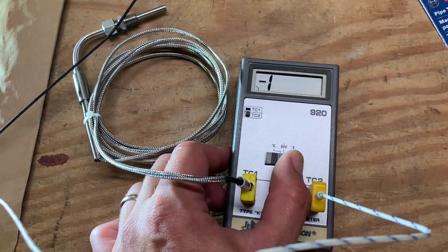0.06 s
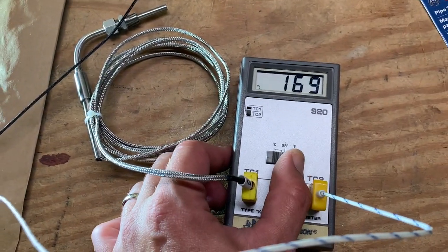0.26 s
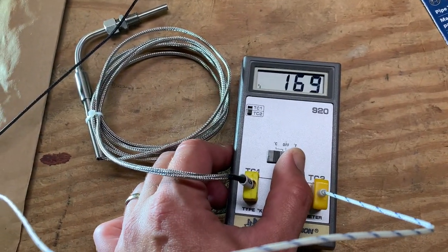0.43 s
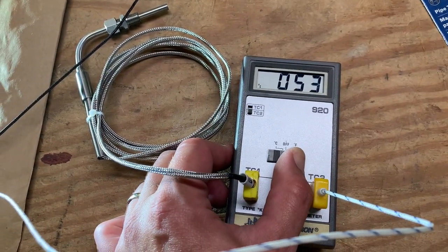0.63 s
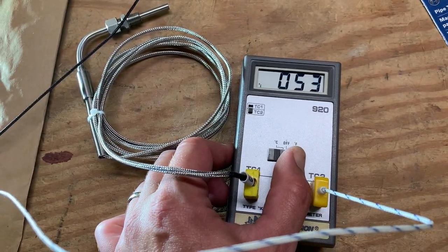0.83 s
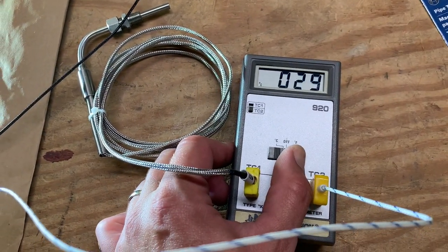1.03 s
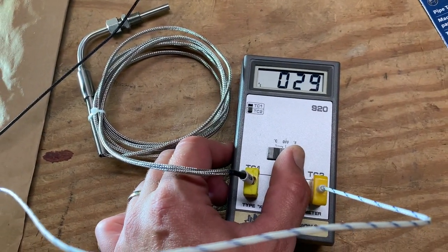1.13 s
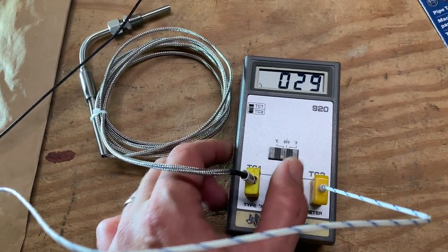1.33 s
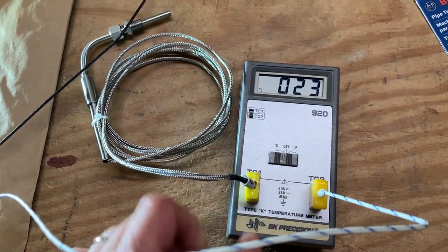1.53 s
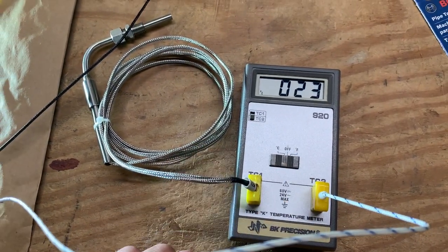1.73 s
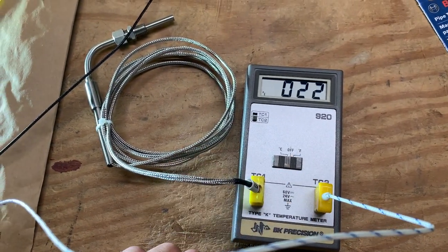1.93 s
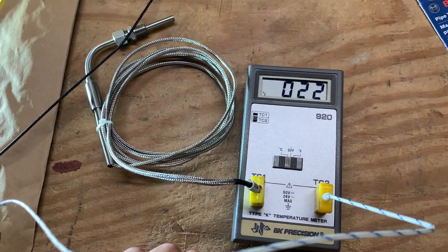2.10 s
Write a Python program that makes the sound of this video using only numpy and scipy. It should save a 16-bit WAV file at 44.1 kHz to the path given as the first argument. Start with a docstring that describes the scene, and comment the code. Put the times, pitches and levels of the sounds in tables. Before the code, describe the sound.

A plastic slide switch snaps sharply, then low buffeting thumps and quiet workshop room tone

```python
"""Slide switch on a workshop bench

A thumb snaps the slide switch of a plastic meter on a wooden bench, close to a handheld camera.
Struck modes and noise cracks make the snap, the boom of the board and a few soft ticks.
Pulses through a resonance make a run of low buffets, then fainter ones; patchy filtered noise
makes the hand's rustle, the swelling workshop tone and the hiss. Decaying noise is the room."""
import sys
import numpy as np
from scipy import signal
from scipy.fft import rfft, irfft, next_fast_len
from scipy.io import wavfile
from scipy.ndimage import uniform_filter1d

SR = 44100
rng = np.random.default_rng(int(sys.argv[2]) if len(sys.argv) > 2 else 0)


def wav_out(sig):
    """Save sig, one row per channel (or a flat mono array), as 16-bit PCM at SR to the path in sys.argv[1]."""
    wavfile.write(sys.argv[1], SR, np.round(np.clip(np.atleast_2d(sig).T, -1, 1) * 32767).astype(np.int16))


def volts(x):
    """Linear amplitude factor 10**(x/20) for a level x in dB, scalar or array-like."""
    e = np.asarray(x, float) / 20
    return 10 ** e


N = 95344  # length in samples

# Workshop tone. Each row: frequency in Hz, relative density in dB per Hz.
ROOM_TONE_SPECTRUM = [(20, -32), (35, 2), (113, -5), (161, -8.5), (227, -3), (328, -12.5), (377, -20),
                      (447, -12), (546, -19.5), (952, -31), (1500, -30.5), (2400, -73)]
# Slow swell of the workshop tone. Each row: time in seconds, added gain in dB.
ROOM_TONE_SWELL = [(0, 16), (.62, -0.5), (.9, 6.5), (1.45, 3.5), (1.7, 9), (1.86, 1.5)]
# Steady hiss. Each row: frequency in Hz, relative density in dB per Hz.
HISS_SPECTRUM = [(760, -29), (1300, -11.5), (1710, -12.5), (2150, 1.5), (2610, -10.5), (4930, -14),
                 (7450, -19), (8840, -9.5), (10600, -16), (11600, -22.5), (13100, -13), (14300, -28.5)]
# Stereo likeness of all the noises. Each row: frequency in Hz, left-right correlation.
NOISE_LIKENESS = [(60, 0.47), (290, 0.27), (640, 0.29), (1400, 0.18)]
ROOM_TONE_BASE_DB, HISS_DB = -59.5, -79  # rms; the swell adds to the first

# Decay of the room. Each row: frequency in Hz, time to fall 60 dB in seconds.
ROOM_DECAY = [(150, .25), (500, 0.58), (1500, .9), (4300, .62), (5600, 0.3), (14000, 0.37)]
WALLS_DB, CLUTTER_DB, CLUTTER_T60_S = -18, -10, 0.11
TICK_SEND_DB, BENCH_SEND_DB = 3.5, -16  # gain into the room

# Bouts of buffets. Each row: start in seconds, length in seconds, level in dB, typical pulse width in ms.
BUFFET_BOUTS = [(0.153, 0.042, -30.5, 2.64), (0.197, 0.04, -31, 0.99), (0.227, 0.028, -33.5, 3.1),
                (0.254, 0.03, -38.5, 1.56), (0.275, 0.035, -34, 2.46), (0.311, 0.011, -32.5, 1.65),
                (0.323, 0.029, -33, 3.6), (1.385, 0.064, -54.5, 2.9), (1.619, 0.073, -49.5, 2.7),
                (1.884, 0.027, -49, 2.2), (1.897, 0.033, -42.5, 2.9), (1.962, 0.062, -49, 3.5)]
BUFFETS_PER_S, BOUT_EDGE_S = 120, 0.0061
BUFFET_WIDTH_SPREAD, BUFFET_SCATTER_DB = 0.18, 1  # the spread is in natural log of the width
BUFFET_LIKENESS = 0.82  # sets how alike left and right are
LOW_RESONANCE_HZ, LOW_RESONANCE_WIDTH_HZ = 66.7, 63.5

# Hand strokes. Each row: start in seconds, length in seconds, drag level in dB, fizz level in dB.
HAND_RUBS = [(1.235, 0.061, -68, -84.5), (1.285, 0.061, -74.5, -87), (1.35, 0.1, -78, -83.5),
             (1.605, 0.077, -81, -85.5)]
# Dull drag of skin. Each row: frequency in Hz, relative density in dB per Hz.
DRAG_SPECTRUM = [(800, -16), (1500, 0), (2500, -2), (3300, -13), (5200, -16), (6500, -40)]
# Fine fizz of skin. Each row: frequency in Hz, relative density in dB per Hz.
FIZZ_SPECTRUM = [(7000, -27), (8500, 2), (10500, -2), (13000, -28), (14000, -58)]
RUB_EDGE_S = 0.012

# Dull ticks on the case. Each row: time in seconds, blow level in dB.
CASE_TICKS = [(1.245, -45), (1.7045, -38), (1.708, -39), (1.712, -42)]
TICK_HZ, TICK_WIDTH_HZ = 1850, 1500

# Soft knocks on the bench. Each row: time in seconds, blow level in dB.
BENCH_KNOCKS = [(1.244, -44), (1.609, -37), (1.6165, -38.5), (1.706, -44)]
# Modes of the board. Each row: frequency in Hz, relative level in dB, time to fall 60 dB in seconds.
BENCH_MODES = [(170, -2.5, 0.049), (215, 3.5, 0.07), (290, -6, 0.049), (447, -9, .04)]
BENCH_DB, BENCH_DELAY_S = -12.5, 0.0038  # against the switch contacts
BENCH_RISE_S, KNOCK_RISE_S = 0.0069, 0.0024

# Switch contacts: release, stop and rebounds. Each row: time in seconds, blow level in dB.
SWITCH_CONTACTS = [(0.0202, -26.5), (.0247, -13), (.0255, -11.5), (0.027, -14.5), (0.0293, -17),
                   (0.0319, -27)]
# Modes of the case. Each row: frequency in Hz, relative level in dB, time to fall 60 dB in seconds.
CASE_MODES = [(995, -4.5, 0.015), (1177, -5, 0.014), (1420, -8.5, 0.013), (1670, -4.5, .013),
              (2136, -5, .011), (2500, -7.5, .009), (3015, -10, .008), (3720, -8, 0.0064), (4370, -3, .008),
              (5900, -13.5, .007), (7970, 2.5, .013), (9450, -13, .007), (14500, -7.5, .005)]
CRACK_DB, CRACK_T60_S, MODE_SCATTER_DB = -0.5, 0.0046, 0.5

# Phase of the direct switch. Each row: frequency in Hz, lead of left over right in radians.
SWITCH_PHASE = [(0, 0.1), (1200, 1.6), (4700, 2.2), (5500, 4.7), (10400, 4.9)]
# Balance of the direct switch. Each row: frequency in Hz, left minus right in dB.
SWITCH_BALANCE = [(60, -2), (180, -3), (550, 4.5), (1650, 4.5), (4970, 3), (15000, 1.5)]
# How the microphone ports hear case, board and ticks. Each row: frequency in Hz, gain in dB.
PORT_RESPONSE = [(4600, 1.5), (6000, -7), (9000, -2.5), (11500, -8.5), (14600, -9.5), (15600, -4.5),
                 (17200, -37)]


def unit(x):
    """Scales a sound to rms 1."""
    return x / np.sqrt(np.mean(x ** 2) + 1e-20)


def along(points, hz):
    """Interpolates (Hz, value) points on a log frequency axis."""
    point_hz, value = np.transpose(points)
    return np.interp(np.log(hz + 1), np.log(point_hz + 1), value)


def curve(rows):
    """Draws one value per sample from (seconds, value) rows."""
    return np.interp(np.arange(N) / SR, *np.transpose(rows))


def filtered(x, response):
    """Multiplies the spectrum of x by a complex response of frequency."""
    size = next_fast_len(N + SR // 2)
    return irfft(rfft(x, size) * response(np.fft.rfftfreq(size, 1 / SR)), size)[..., :N]


def rush(spectrum, patchy_db):
    """Stereo noise of rms 1 whose gain wanders in patches of time and frequency."""
    noise = signal.stft(rng.standard_normal((2, N)), nperseg=512)[2]
    patches = uniform_filter1d(rng.standard_normal(noise.shape[1:]), size=5, axis=0)
    patches = uniform_filter1d(patches, size=8, axis=1)
    pair = signal.istft(noise * volts(patchy_db * unit(patches)), nperseg=512)[1][:, :N]

    def mid_side(hz):
        # this angle between mid and side sets the left-right correlation
        angle = np.arccos(np.clip(along(NOISE_LIKENESS, hz), -1, 1)) / 2
        return volts(along(spectrum, hz)) * [np.cos(angle), np.sin(angle)]

    mid, side = filtered(pair, mid_side)
    return unit(np.array([mid + side, mid - side]))


def struck(hits, modes, rise_s, crack_db):
    """Every blow rings decaying sine modes anew and adds a short noise crack."""
    out, t = np.zeros(N + SR), np.arange(SR // 4) / SR
    hz, level_db, t60 = np.transpose(modes)[:, :, None]
    for start, db in hits:
        mode_db = level_db + MODE_SCATTER_DB * rng.standard_normal(hz.shape)
        ring = (volts(mode_db - 60 * t / t60) * np.sin(2 * np.pi * hz * t)).sum(axis=0)
        ring *= 1 - np.exp(-t / rise_s)
        crack = volts(crack_db - 60 * t / CRACK_T60_S) * rng.standard_normal(len(t))
        out[round(start * SR):][:len(t)] += volts(db) * (0.5 * ring + crack)
    return out[:N]


def room_tone():
    """The workshop's low tone: shaped noise that swells and sinks."""
    return volts(ROOM_TONE_BASE_DB + curve(ROOM_TONE_SWELL)) * rush(ROOM_TONE_SPECTRUM, patchy_db=1.5)


def hiss():
    """A faint bed of higher shaped noise at a constant overall level."""
    return volts(HISS_DB) * rush(HISS_SPECTRUM, patchy_db=2.77)


def room(x):
    """A quick answer from the bench's clutter, and the walls, each frequency dying at its own speed."""
    hz, t, noise = signal.stft(rng.standard_normal((2, SR)), SR, nperseg=256)
    decay = volts(-60 * t / along(ROOM_DECAY, hz)[:, None])
    walls = signal.istft(noise * decay, SR, nperseg=256)[1][:, :SR]
    clutter = rng.standard_normal((2, SR)) * volts(-60 * np.arange(SR) / SR / CLUTTER_T60_S)
    echo = volts(WALLS_DB) * walls / np.linalg.norm(walls[0])
    echo += volts(CLUTTER_DB) * clutter / np.linalg.norm(clutter[0])
    delayed = np.pad(x, (120, 0))  # samples before the first echo
    return signal.fftconvolve(delayed[None], echo, axes=1)[:, :N]


def low_resonance(hz):
    """A broad low resonance with a further low cut, which gives each buffet its swing."""
    width = 1j * hz * LOW_RESONANCE_WIDTH_HZ
    resonance = (1j * hz) ** 2 / (LOW_RESONANCE_HZ ** 2 - hz * hz + width)
    return resonance * 1j * hz / (LOW_RESONANCE_HZ + 1j * hz)


def even(x):
    """Levels out a sound by its running rms over some tens of milliseconds."""
    power = uniform_filter1d(uniform_filter1d(x ** 2, size=SR // 50), size=SR // 50)
    return x / np.sqrt(np.abs(power) + 1e-9)


def buffeting():
    """Rounded pulses of alternating sign pass a low resonance in bouts, partly apart in left and right."""
    count = int(BUFFETS_PER_S * N / SR)
    t = np.arange(-1200, 1200) / SR
    draw = rng.standard_normal((count, 3))  # width, strength, side strength
    at = ((np.arange(count) + rng.random(count)) / count * N).astype(int)

    # each pulse takes its typical width from the nearest bout
    start, span, _, width_ms = np.transpose(BUFFET_BOUTS)
    nearest = np.abs(at[:, None] / SR - start - span / 2).argmin(axis=1)
    stretch = np.exp(BUFFET_WIDTH_SPREAD * np.clip(draw[:, :1], -1.5, 1.5))
    width = width_ms[nearest, None] / 1000 * stretch
    strength = volts(BUFFET_SCATTER_DB * draw[:, 1:2]) * (-1.) ** np.arange(count)[:, None]
    pulse = strength * np.exp(-0.5 * (t / width) ** 2)
    where = (at[:, None] + np.arange(len(t))).ravel()

    def train(size, late):
        pulses = np.bincount(where + late, (pulse * size).ravel(), N + 2 * len(t))
        return pulses[len(t) // 2:][:N]

    mid = even(filtered(train(1, 0), low_resonance))
    side = even(filtered(train(draw[:, 2:], 90), low_resonance))  # 90 samples later
    side *= np.tan(np.arccos(np.clip(BUFFET_LIKENESS, 0, 1)) / 2)

    now, level = np.arange(N) / SR, np.zeros(N)
    edge = lambda u: np.sin(np.pi / 2 * np.clip(u / BOUT_EDGE_S, 0, 1)) ** 2
    for begin, length, db, _ in BUFFET_BOUTS:
        level += volts(db) * edge(now - begin) * edge(begin + length + BOUT_EDGE_S - now)
    return level * np.array([mid + side, mid - side])


def hand():
    """Short soft strokes of skin on plastic: noise in a dull drag and a fine fizz."""
    t, out = np.arange(N) / SR, np.zeros((2, N))
    edge = lambda u: np.clip(u / RUB_EDGE_S, 0, 1)
    drag, fizz = rush(DRAG_SPECTRUM, patchy_db=5.5), rush(FIZZ_SPECTRUM, patchy_db=4.5)
    for start, span, drag_db, fizz_db in HAND_RUBS:
        stroke = edge(t - start) * edge(start + span - t)
        out += stroke * (volts(drag_db) * drag + volts(fizz_db) * fizz)
    return out


def tick():
    """Soft, dull contacts on the same case: the fingertip damps its highs and lows."""
    def fingertip(hz):
        width = 1j * hz * TICK_WIDTH_HZ
        return (width / (TICK_HZ ** 2 - hz * hz + width)) ** 2

    return filtered(struck(CASE_TICKS, CASE_MODES, 0.0034, CRACK_DB - 23.5), fingertip)


def bench():
    """The board's low modes boom just after each switch contact, and under soft knocks."""
    pushed = [(start + BENCH_DELAY_S, db + BENCH_DB) for start, db in SWITCH_CONTACTS]
    boom = struck(pushed, BENCH_MODES, BENCH_RISE_S, -80)
    return boom + struck(BENCH_KNOCKS, BENCH_MODES, KNOCK_RISE_S, -80)


def case():
    """The slider snaps over and rattles to rest, ringing the case with a crack at each contact."""
    return struck(SWITCH_CONTACTS, CASE_MODES, 0.00032, CRACK_DB)


def off_axis(meter):
    """Splits level and phase between the ports, as the meter lies off their axis."""
    lead_hz, lead = np.transpose(SWITCH_PHASE)

    def both_ports(hz):
        phase = np.exp(0.5j * np.interp(hz, lead_hz, lead))
        left = volts(along(SWITCH_BALANCE, hz) / 2) * phase
        return np.array([left, 1 / left])

    return filtered(meter, both_ports)


def scene():
    """Mixes the meter off axis, board and ticks in the centre, with room, buffets, hand and floor around."""
    floor = room_tone() + hiss()
    meter, board, tap = case(), bench(), tick()
    echo = room(meter + volts(BENCH_SEND_DB) * board + volts(TICK_SEND_DB) * tap)
    at_ports = off_axis(meter) + board + tap + echo
    switch = filtered(at_ports, lambda hz: volts(along(PORT_RESPONSE, hz)))
    return floor + buffeting() + hand() + switch


def top_cut(x):
    """Nothing passes above the cut-off."""
    return signal.sosfilt(signal.butter(12, 16960, fs=SR, output="sos"), x)


def record(dry):
    """Turns the finished mix into the sound that is written out."""
    return top_cut(dry)


dry = scene()
out = record(dry)
wav_out(out)
```